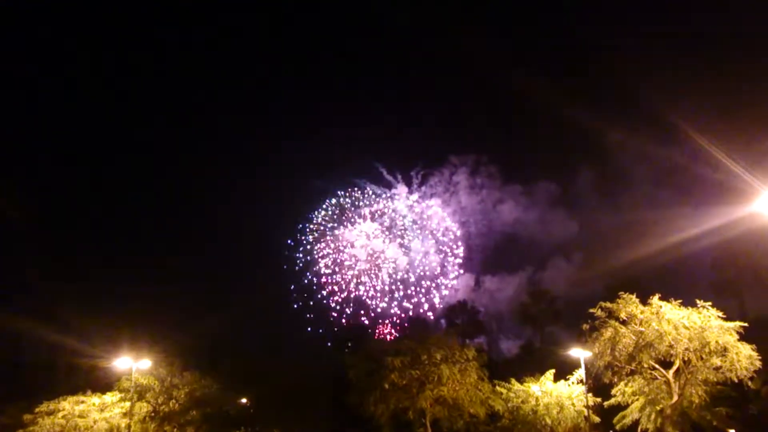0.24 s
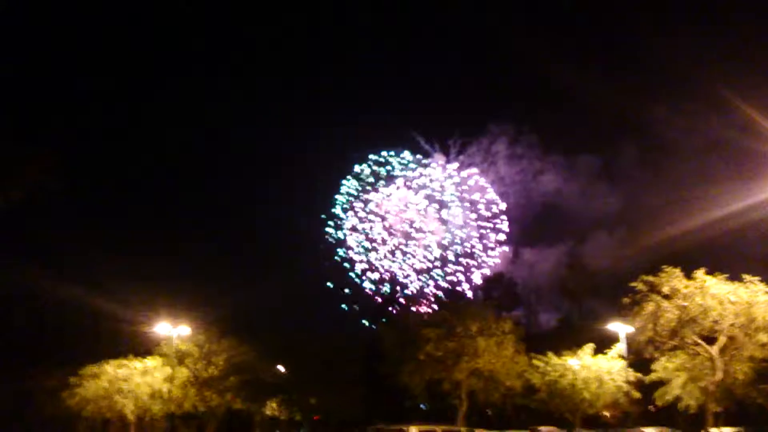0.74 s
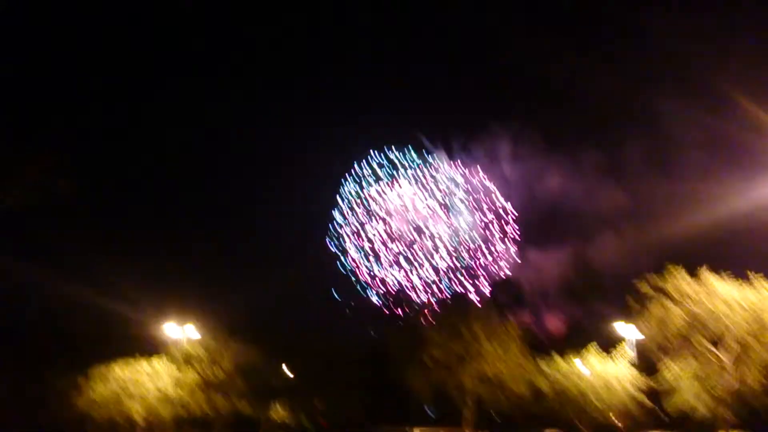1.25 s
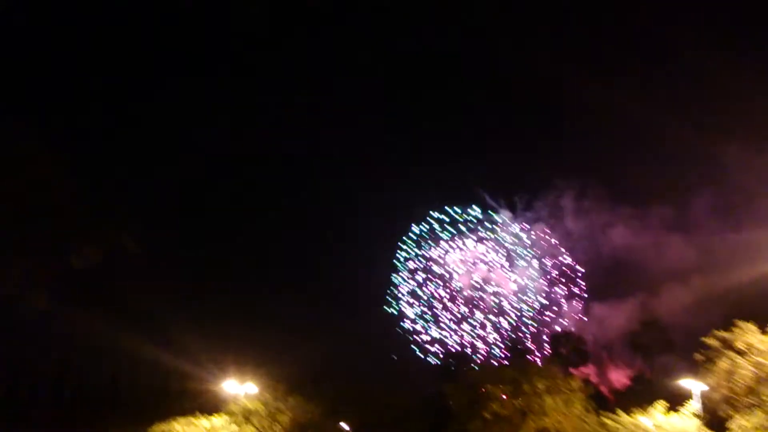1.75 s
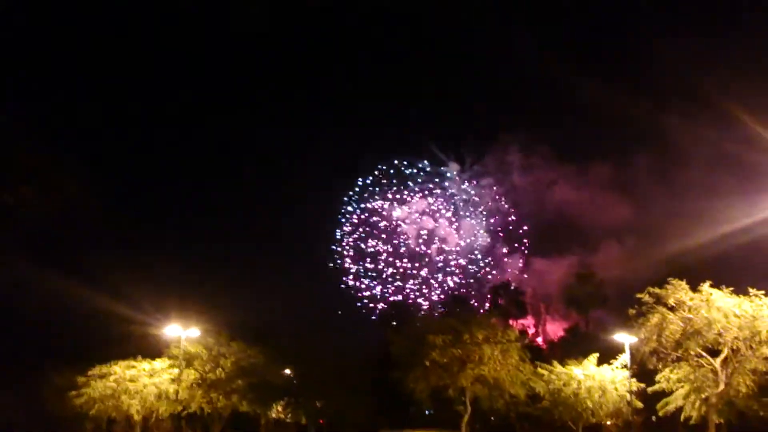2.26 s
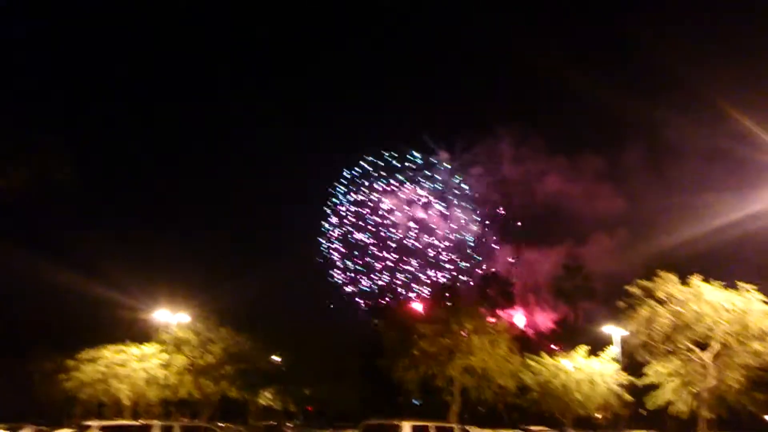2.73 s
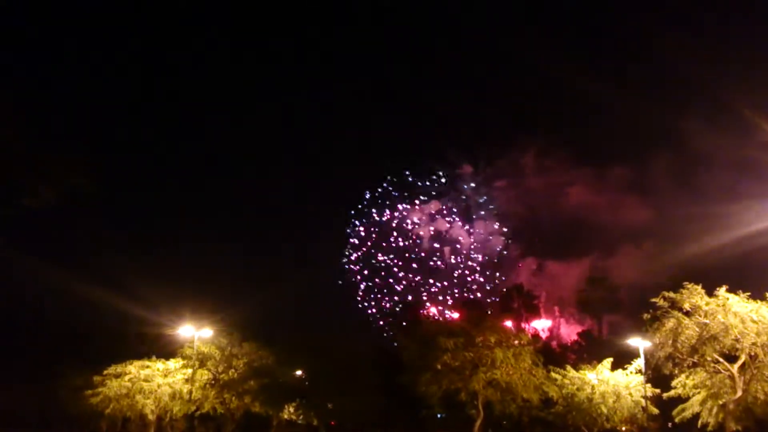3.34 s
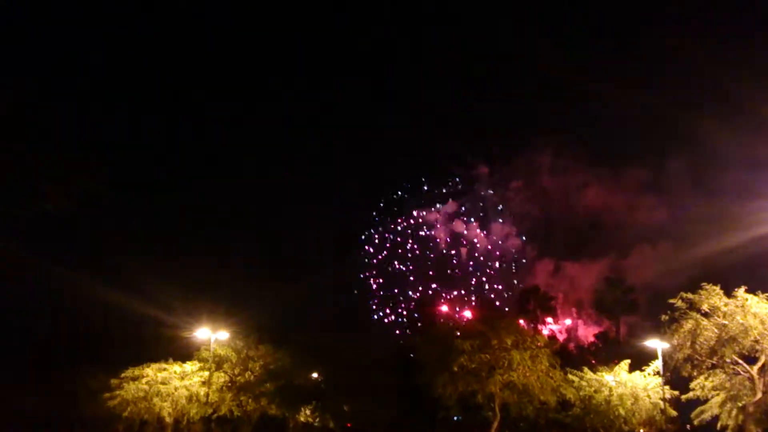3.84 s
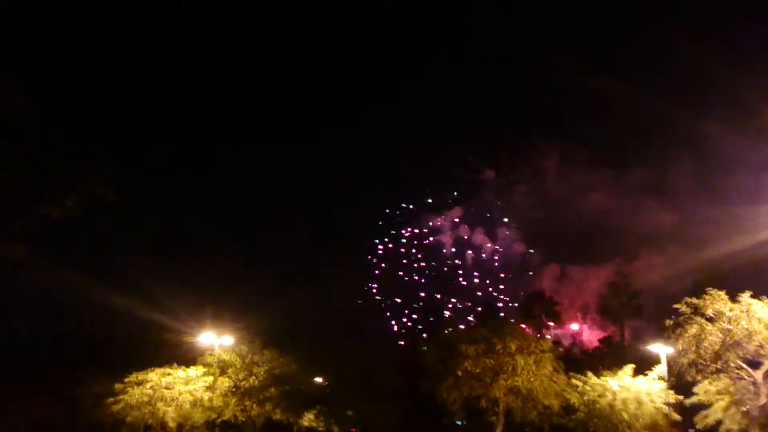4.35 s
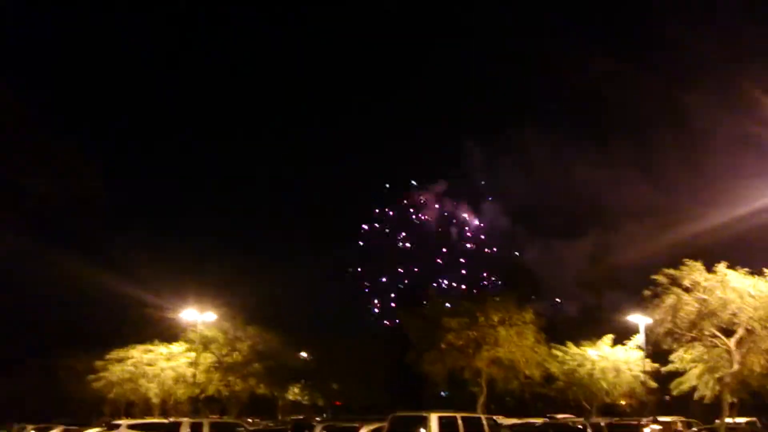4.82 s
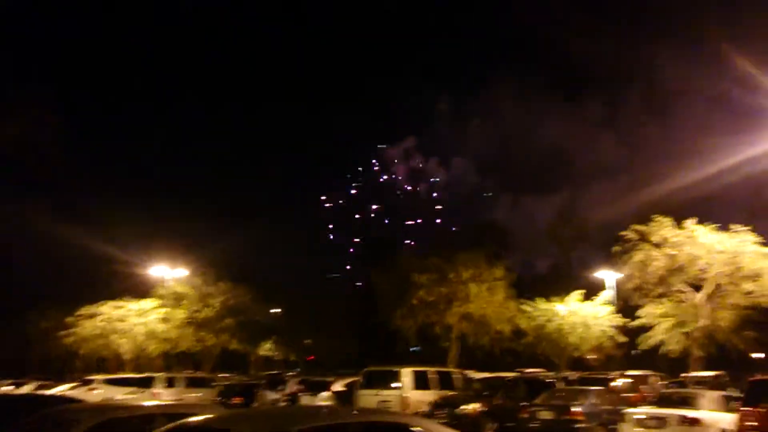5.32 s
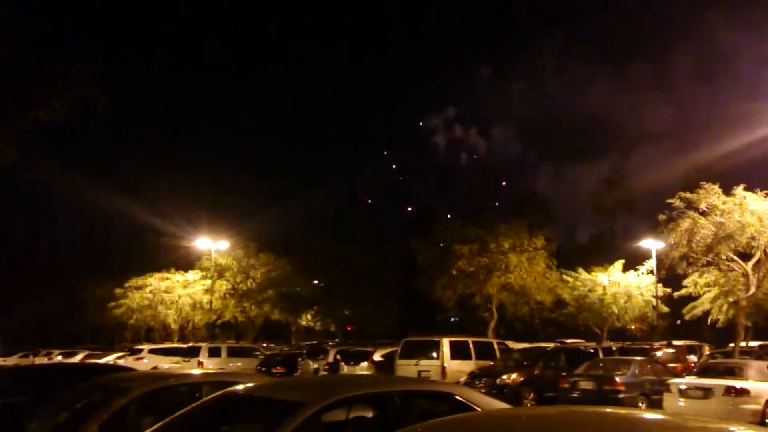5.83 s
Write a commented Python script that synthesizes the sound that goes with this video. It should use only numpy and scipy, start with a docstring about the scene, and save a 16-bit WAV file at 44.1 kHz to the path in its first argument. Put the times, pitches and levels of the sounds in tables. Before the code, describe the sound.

Four loud firework shells burst about half a second apart over a car park at night. Each sharp bang overloads the microphone, slaps back from cars and trees and rolls away. Dull, faraway thuds follow above a low rumble as the echo fades. Fingers click lightly on the handheld camera, and near the end there is one close, rattly knock and a brief rub.

```python
"""A car park at night: four firework shells burst overhead. Each shock wave overloads the camera's
microphones, reflects from parked cars and trees and rolls away over the town, above a low rumble.
Far thuds and a faint whistle follow. The hand on the camera excites its case by impact and friction
(clicks, a knock, rubbing), and the lens motor whines faintly."""
import sys
import numpy as np
from scipy import signal
from scipy.fft import rfft, irfft, next_fast_len
from scipy.io import wavfile
from scipy.ndimage import map_coordinates

SR = 44100
rng = np.random.default_rng(int(sys.argv[2]) if len(sys.argv) > 2 else 0)


def transcribe(signal):
    """Save signal, clipped to [-1, 1], as a 16-bit WAV file at the path in sys.argv[1]."""
    frames = np.atleast_2d(signal).T
    limited = np.clip(frames, -1, 1)
    pcm = np.round(limited * 32767).astype(np.int16)
    wavfile.write(sys.argv[1], SR, pcm)


N = 268110

# Shell bursts: start_s, shock_db, echo_db, push_s
BURSTS = [(.0355, 4, -.5, .0017), (.3788, 4.5, .8, .0012), (.8990, 5, 1.2, .0016), (1.4586, 3, -.2, .0021)]
# Reflections from ground and cars (lean is left minus right): delay_s, level_db, left_lag_s, lean_db
REFLECTIONS = [(.0012, -15, -.0001, 2), (.0017, -6, -.0002, -6), (.0050, -13, 0, -1),
               (.0084, -15, -.0002, -4), (.0118, -11, .0004, -4), (.0165, -20, -.0003, -3),
               (.0228, -15, .0003, -6)]
# Distant reports: start_s, level_db, centre_hz
FAR_THUDS = [(1.296, -36, 250), (1.411, -36, 600), (2.102, -35, 200), (2.443, -34, 200), (2.606, -37, 700),
             (2.765, -33, 550), (2.790, -35, 600), (3.002, -33, 900), (3.029, -35, 900), (3.114, -41, 800)]
# Spectrum of a distant report: multiple_of_centre, level_db
THUD_SPECTRUM = [(.1, -14), (.5, -4), (1, 0), (1.4, -4), (2.2, -20), (5, -42), (20, -70)]
# Finger impacts on the case: start_s, tick_db, clack_db, clack_hz, lean_db, t60_s
FINGER_TAPS = [(.1846, -54, -33, 4300, -3, .03), (1.341, -40, -47, 4200, 18, .04),
               (1.5201, -39, -46, 3000, -8, .02), (1.6912, -47, -25, 2900, -8, .022),
               (2.0205, -28, -42, 4000, -22, .01), (4.3452, -43, -45, 2000, -10, .014),
               (4.7398, -42, -35, 2900, -8, .022), (4.754, -54, -44, 2900, -7, .15),
               (4.825, -46, -40, 2700, -8, .035), (4.8331, -24, -36, 2400, -12, .017),
               (4.9902, -45, -56, 3000, -8, .012), (5.0705, -40, -51, 3800, -10, .035),
               (5.6692, -50, -60, 3000, -10, .02)]
# Slides of the hand: start_s, swell_s, release_at_s, level_db
HAND_STROKES = [(3.3, 1.25, 5.1, -67.5), (5.905, .07, 6.1, -43.3)]
# Runs of the lens motor: start_s, length_s, pitch_hz, level_db
MOTOR_RUNS = [(2.04, .32, 8600, -68), (2.58, .18, 6080, -61.5), (3.18, .15, 6080, -68),
              (4.655, .07, 11800, -58)]

# Spectral shapes: frequency_hz, level_db
RUMBLE_SPECTRUM = [(15, -2), (30, 1), (42, -2), (55, -6), (70, -12), (92, -14), (115, -24), (180, -40),
                   (310, -70)]
HISS_SPECTRUM = [(100, 9), (2500, 9), (4000, 3), (6000, 0), (11000, 0), (15000, -5), (16000, -14)]
LOW_ROLL_SPECTRUM = [(40, -8), (85, 4), (125, -1), (190, 1.5), (400, -7), (800, -25), (2000, -60)]  # far echo, bass
MID_ROLL_SPECTRUM = [(150, -25), (400, -2), (600, -.5), (800, -4), (1100, -6), (1500, -9), (2050, -8.5),
                     (2900, -22), (5000, -35), (9000, -46), (16000, -55)]  # far echo, middle
FRICTION_SPECTRUM = [(60, 8), (150, 0), (300, 4), (430, 11), (700, -1), (2000, -2), (3500, -7), (5000, -16),
                     (6500, -1), (8000, 0), (9500, -30), (12000, -21), (15000, -36)]  # skin on the case
TICK_SPECTRUM = [(200, -30), (3000, -22), (5000, -25), (6300, -13), (7400, 0), (8300, -6), (9700, -25),
                 (11500, -13), (14000, -21), (15000, -28), (16000, -42)]  # wall of the case
CAVITY_SPECTRUM = [(100, -10), (280, 0), (370, 11), (500, -3), (750, -1), (1200, -3), (1900, -8),
                   (3100, -15), (5000, -26), (9000, -40)]  # hollow of the case
AIR_PATH_SPECTRUM = [(30, -10), (90, 3), (135, -4), (350, -5), (650, 2), (1000, -1), (2200, 3), (4000, -6),
                     (5500, -15), (8000, -16), (11000, -17), (16000, -33)]  # colours the shock
CAR_ECHO_SPECTRUM = [(30, -18), (90, 0), (120, -4), (165, 3), (230, 1), (350, -7), (650, -4), (950, -12),
                     (2200, -11), (3000, -17), (4500, -27), (5500, -33), (8500, -36), (10000, -52),
                     (12000, -66), (16000, -78)]
TREE_ECHO_SPECTRUM = [(30, -8), (85, 6), (140, 3), (200, 2.5), (400, -7), (700, -8.5), (1200, -12),
                      (2200, -11), (4400, -25), (5500, -35), (8500, -39), (10000, -56), (16000, -78)]  # trees and buildings

# Likeness of diffuse sound at the two microphone ports: frequency_hz, correlation
DIFFUSE_COHERENCE = [(60, .93), (250, .9), (640, .55), (1400, 0), (15000, 0)]
# Balance of diffuse sound: frequency_hz, lean_db
DIFFUSE_LEAN = [(50, -8), (130, -5.5), (300, -4), (700, -3.5), (1400, -7), (2200, -9), (4000, -5),
                (7500, -7), (10000, 0), (15000, 2)]
# Balance of rubbing beside the right port: frequency_hz, lean_db
FRICTION_LEAN = [(400, -4), (1500, -10), (7500, -22), (12000, -14)]

# Echo stages: level_db, delay_s, rise_s, bass_t60_s, treble_t60_s
CARS, TREES, BUILDINGS = (-11.5, 0, .003, .21, .16), (-23, .045, .012, .43, .38), (-32.5, .12, .06, 1.2, 1)


def amp(db):
    """Amplitude ratio of a level in decibels."""
    return 10 ** (np.asarray(db) / 20)


def unit(x):
    """Normalisation to rms 1."""
    return x / np.sqrt(np.mean(x ** 2) + 1e-20)


def along(points, hz):
    """Interpolation of (frequency_hz, value) points on a logarithmic frequency axis."""
    knots_hz, values = np.transpose(points)
    return np.interp(np.log(hz + 1), np.log(knots_hz + 1), values)


def wobble(rate, n=N):
    """Smooth random modulation with rate knots a second."""
    return map_coordinates(rng.standard_normal(int(n * rate / SR) + 4), [np.arange(n) * rate / SR])


def strewn(count):
    """Stratified chance events: each row is a place from 0 to 1 and two normal deviates."""
    return np.column_stack([(np.arange(count) + rng.random(count)) / count, rng.standard_normal((count, 2))])


def pan(lean_db):
    """Constant-power panning: left and right gains that differ by lean_db."""
    gains = amp(np.array([np.atleast_1d(lean_db), -np.atleast_1d(lean_db)]) / 2)
    return gains / np.sqrt(np.mean(gains ** 2, axis=0))


def fade(t, t60):
    """Exponential decay of 60 dB in t60 seconds."""
    return np.exp(-np.log(1000) * t / t60)


def add(out, start_s, x):
    """Superposition of x on out from start_s."""
    i = max(round(start_s * SR), 0)
    out[:, i:i + x.shape[-1]] += x[..., :max(N - i, 0)]


def filtered(x, response):
    """Linear filtering: the spectrum of x times a complex frequency response."""
    n = x.shape[-1]
    size = next_fast_len(n + 8192)
    return irfft(rfft(x, size) * response(np.fft.rfftfreq(size, 1 / SR)), size)[..., :n]


def minimum_phase(spectrum, size=4096):
    """The causal impulse response of least delay that has this spectrum."""
    cepstrum = irfft(np.log(amp(along(spectrum, np.fft.rfftfreq(size, 1 / SR)))))
    return irfft(np.exp(rfft(np.r_[cepstrum[0], 2 * cepstrum[1:size // 2]], size)))


def noise(spectrum, n):
    """Coloured noise of rms 1, incoherent between the two ports."""
    return unit(filtered(rng.standard_normal((2, n)), lambda hz: amp(along(spectrum, hz))))


def diffuse(spectrum, n):
    """A diffuse field of rms 1: coherent at long wavelengths, stronger on the right."""
    size = next_fast_len(n, True)
    hz = np.fft.rfftfreq(size, 1 / SR)
    angle = np.arccos(np.clip(along(DIFFUSE_COHERENCE, hz), -1, 1)) / 2
    coloured = rfft(rng.standard_normal((2, size))) * amp(along(spectrum, hz))
    mid, side = coloured * [np.cos(angle), np.sin(angle)]
    return unit(irfft([mid + side, mid - side] * pan(along(DIFFUSE_LEAN, hz)), size)[:, :n])


def night_air():
    """Ambient noise: a gently wavering rumble and a faint hiss, both diffuse."""
    rumble = amp(-44.3 + 1.5 * wobble(7)) * diffuse(RUMBLE_SPECTRUM, N)
    return rumble + amp(-71.5) * diffuse(HISS_SPECTRUM, N)


def roll_gain(held_db, hold_s, fall_db_per_s, town_db):
    """Reverberant decay: held until hold_s after the last burst, then sinking to the town's level."""
    falling_s = np.maximum(np.arange(N) / SR - BURSTS[-1][0] - hold_s, 0)
    return np.hypot(amp(held_db - fall_db_per_s * falling_s), amp(town_db))


def town_roll():
    """Reverberation: the bangs roll on over the town in two bands that swell together."""
    swell = wobble(14)
    low = roll_gain(held_db=-46.5, hold_s=.55, fall_db_per_s=5.4, town_db=-61.5)
    low = low * amp(1.2 * swell + 1.2 * wobble(22)) * diffuse(LOW_ROLL_SPECTRUM, N)
    mid = roll_gain(held_db=-48, hold_s=.9, fall_db_per_s=6, town_db=-60)
    mid = mid * amp(.7 * swell + .6 * wobble(40)) * diffuse(MID_ROLL_SPECTRUM, N)
    return low + mid


def far_whistle(start_s=4.4, length_s=.75, pitch_hz=2050, sag_hz_per_s=270):
    """Propagation through the air makes a far tone flutter as its pitch sags."""
    out, t = np.zeros((2, N)), np.arange(int(length_s * SR)) / SR
    hz = (pitch_hz - sag_hz_per_s * t) * (1 + .008 * wobble(150, len(t)))
    tone = np.sin(2 * np.pi * np.cumsum(hz) / SR)
    flutter = amp(-68 + 3 * wobble(30, len(t)))
    add(out, start_s, flutter * pan(-7) * tone * np.sin(np.pi * t / length_s))
    return out


def far_thuds(t60_s=.07, rise_s=.0007):
    """Reports dulled by distance: damped bursts of band noise, with four fainter ones at random."""
    out, t = np.zeros((2, N)), np.arange(SR // 4) / SR
    faint = [(2.8 + place, -44 + 2 * loud, 380 * 2 ** (.5 * high)) for place, loud, high in strewn(4)]
    for start_s, level_db, centre_hz in list(FAR_THUDS) + faint:
        body = diffuse([(ratio * centre_hz, db) for ratio, db in THUD_SPECTRUM], len(t))
        add(out, start_s, amp(level_db) * body * fade(t, t60_s) * (1 - np.exp(-t / rise_s)))
    return out


def lens_motor(waver=.014, octave_db=-2):
    """Periodic vibration of the motor: a thin tone and its second harmonic swell and die away."""
    out = np.zeros((2, N))
    for start_s, length_s, pitch_hz, level_db in MOTOR_RUNS:
        n = int(length_s * SR)
        phase = 2 * np.pi * np.cumsum(pitch_hz * (1 + waver * wobble(500, n))) / SR
        tone = np.sin(phase) + amp(octave_db) * np.sin(2 * phase)
        swell = np.abs(np.sin(np.pi * np.sqrt(np.linspace(0, 1, n)))) ** 1.5
        add(out, start_s, amp(level_db + 2 * wobble(120, n)) * pan(-5) * tone * swell)
    return out


def rubbing(rough_db=1.5, release_s=.2):
    """Sliding friction of skin on the case by the right port; each stroke swells, holds and lets go."""
    t, pressure = np.arange(N) / SR, np.zeros(N)
    for start_s, swell_s, release_at_s, level_db in HAND_STROKES:
        swell = np.clip((t - start_s) / swell_s, 0, 1) ** 1.5
        pressure += amp(level_db) * swell * np.clip(1 - (t - release_at_s) / release_s, 0, 1)
    roughness = amp(rough_db * wobble(70))
    friction = filtered(noise(FRICTION_SPECTRUM, N), lambda hz: pan(along(FRICTION_LEAN, hz)))
    return pressure * roughness * friction


def contact(tick_db, clack_db, hz, lean_db, t60_s, rise_s=.0004):
    """Impact excitation of the case: a bright tick of the wall, a hollow clack and a faint after-ring."""
    t = np.arange(SR // 6) / SR
    resonance = [(hz / 8, -18), (hz / 1.5, -11), (hz, 0), (hz * 1.4, -16), (hz * 3, -40)]
    clack = amp(clack_db) * pan(.6 * lean_db) * noise(resonance, len(t))
    tick = amp(tick_db) * pan(lean_db) * noise(TICK_SPECTRUM, len(t))
    after_ring = amp(-32) * fade(t, .13)
    return (tick + clack) * (fade(t, t60_s) + after_ring) * (1 - np.exp(-t / rise_s))


def fingers(shift_from_s=4.25, shift_to_s=5.1):
    """Light impacts of fingers on the case, with six tiny random ones as the grip shifts."""
    out = np.zeros((2, N))
    for start_s, *touch in FINGER_TAPS:
        add(out, start_s, contact(*touch))
    for place, tick, clack in strewn(6):
        touch = contact(-57 + 2.5 * tick, -57 + 2.5 * clack, hz=3000, lean_db=-9, t60_s=.025)
        add(out, shift_from_s + place * (shift_to_s - shift_from_s), touch)
    return out


def knock(start_s=5.1765, mode_hz=203, t60_s=.055, swing_loss_db=4, settle_s=.0303):
    """Damped vibration of the case after a finger's thump; a loose part chatters once per cycle."""
    out, t = np.zeros((2, N)), np.arange(SR // 6) / SR
    thump = amp(-9.5) * np.sin(2 * np.pi * mode_hz * t) + amp(-16) * diffuse(CAVITY_SPECTRUM, len(t))
    add(out, start_s, pan(-2) * thump * fade(t, t60_s) * (1 - np.exp(-t / .004)))
    for swing in range(5):
        loss_db = swing * swing_loss_db
        chatter = contact(-12.5 - loss_db, -20 - loss_db, hz=1900, lean_db=-17, t60_s=.022)
        add(out, start_s + swing / mode_hz, chatter)
    # The part drops back into place and leaves the case buzzing.
    drop = contact(-21, -42, hz=1900, lean_db=-17, t60_s=.012)
    buzz = contact(-47, -48, hz=3800, lean_db=-17, t60_s=.1)
    add(out, start_s + settle_s, drop + buzz)
    return out


def scatter(stage, spectrum, lumpy_db, crossover_hz=2200):
    """Scattering: a crowd of small echoes builds up and dies away, treble first."""
    level_db, delay_s, rise_s, bass_t60_s, treble_t60_s = stage
    t = np.maximum(np.arange(SR) / SR - delay_s, 0)
    crowd = diffuse(spectrum, len(t))
    bass = signal.sosfiltfilt(signal.butter(2, crossover_hz, fs=SR, output="sos"), crowd)
    tail = bass * fade(t, bass_t60_s) + (crowd - bass) * fade(t, treble_t60_s)
    return tail * amp(level_db + lumpy_db * wobble(90, len(t))) * (1 - np.exp(-t / rise_s))


def reflections(hz):
    """Specular reflection: the response of ground and cars, each path with its own delay to each port."""
    response = 0
    for delay_s, level_db, left_lag_s, lean_db in REFLECTIONS:
        arrival_s = np.array([[delay_s + left_lag_s], [delay_s]])
        response += amp(level_db + rng.normal(0, 1.5)) * pan(lean_db) * np.exp(-2j * np.pi * hz * arrival_s)
    return response


def shock(push_s, ring_hz=213, ring_t60_s=.04, front_s=.00018):
    """A blast wave, a pressure jump and a longer suction, sets the case ringing and slaps back."""
    t = np.arange(SR // 8) / SR
    blast = (1 - t / push_s) * np.exp(-t / push_s)
    wave = -signal.fftconvolve(blast, minimum_phase(AIR_PATH_SPECTRUM))[:len(t)]
    ring = -np.cos(2 * np.pi * ring_hz * t) * fade(t, ring_t60_s) * (1 - np.exp(-t / push_s))
    front = 1 - np.exp(-(t / front_s) ** 2)  # the long air path blunts the front
    return pan(-3) * (wave * front + ring) + filtered(wave, reflections)


def shells():
    """Multipath propagation: each burst arrives as a shock, then as echoes of cars, trees and buildings."""
    out = np.zeros((2, N))
    for start_s, shock_db, echo_db, push_s in BURSTS:
        add(out, start_s, amp(shock_db) * shock(push_s))
        echoes = scatter(CARS, CAR_ECHO_SPECTRUM, lumpy_db=1.2)
        echoes += scatter(TREES, TREE_ECHO_SPECTRUM, lumpy_db=1.6)
        echoes += scatter(BUILDINGS, TREE_ECHO_SPECTRUM, lumpy_db=1.8)
        add(out, start_s, amp(echo_db) * echoes)
    return out


def scene():
    """Linear superposition of all sources at the two ports."""
    outdoors = shells() + far_thuds() + town_roll() + night_air()
    return outdoors + fingers() + knock() + rubbing() + lens_motor() + far_whistle()


def record(dry, ceiling=.52, lift=2.3, corner_hz=1200, hardness=30, cutoff_hz=15900):
    """Saturation: the dull microphones overload on the shocks; a treble lift sharpens the clipped edges."""
    corner = 2 * np.pi * corner_hz
    b, a = signal.bilinear([lift, corner], [1, corner], SR)
    dull = signal.lfilter(a, b, dry)  # inverse of the treble lift
    clipped = dull / (1 + np.abs(dull / ceiling) ** hardness) ** (1 / hardness)
    return filtered(signal.lfilter(b, a, clipped), lambda hz: hz < cutoff_hz)


dry = scene()
out = record(dry)
transcribe(out)
```